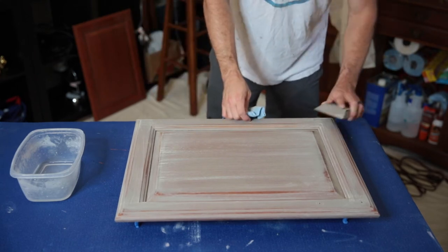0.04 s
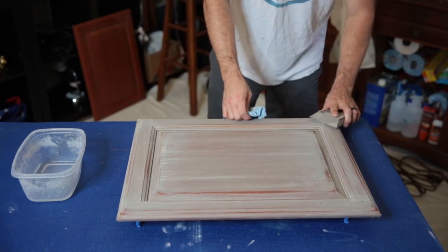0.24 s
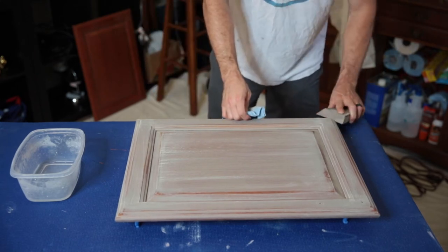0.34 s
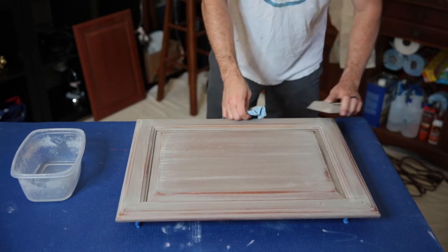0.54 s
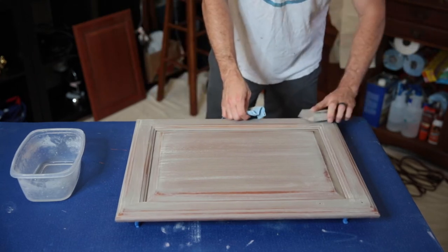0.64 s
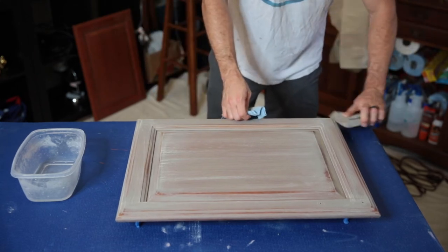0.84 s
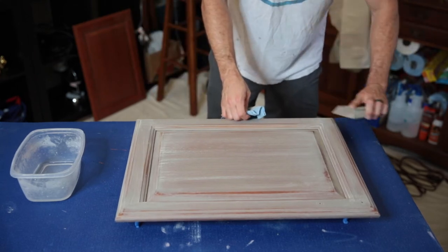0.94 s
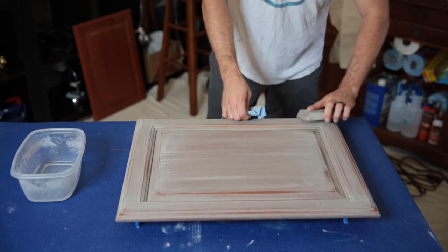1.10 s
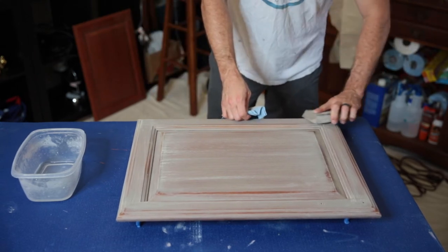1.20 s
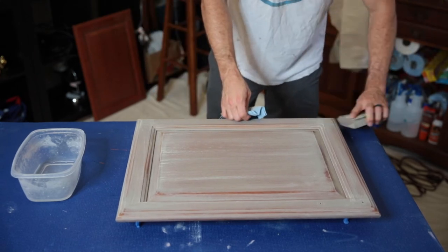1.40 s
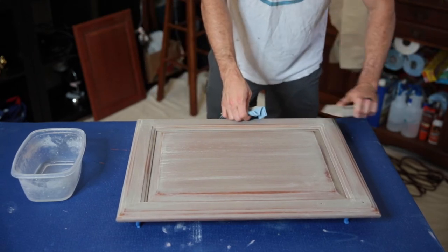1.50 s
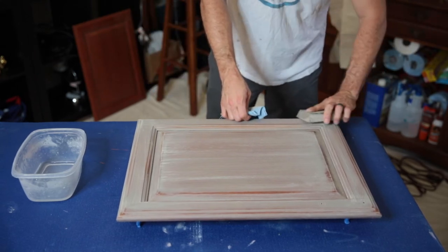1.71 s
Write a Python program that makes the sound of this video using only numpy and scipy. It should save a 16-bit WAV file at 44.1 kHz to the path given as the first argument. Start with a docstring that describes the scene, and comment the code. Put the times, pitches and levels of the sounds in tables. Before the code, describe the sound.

Sanding on a painted wooden door: the tail of one gritty stroke at the start, then quick raspy strokes at about 0.2-0.5, 0.7-1.0 and 1.2-1.6 seconds, brightest near 0.33, 0.8 and 1.3. Light woody bumps, tiny grain ticks and soft low thuds accompany them. The panel drums hollowly; a small workshop rings briefly over quiet room tone and faint hum. Close, mono.

```python
"""Sanding a cabinet door

A sanding block sweeps in quick strokes along the edge of a painted wooden door on a workbench.
Dense grit impacts scratch the paint, brighter as the block speeds up, and drum the panel's modes.
Coarse grains tick, the block bumps on the moulding, and slow pushes flex the panel in soft thuds.
A small workshop rings after each stroke, over room tone and a faint mains hum; both channels are alike."""
import sys
import numpy as np
from scipy import signal
from scipy.fft import rfft, irfft
from scipy.io import wavfile

SR = 44100
rng = np.random.default_rng(int(sys.argv[2]) if len(sys.argv) > 2 else 0)


def inscribe(sig):
    """Save sig as 16-bit PCM at rate SR to the path in sys.argv[1].

    A 1-D sig is mono; a 2-D sig holds one channel per row.
    Samples are clipped to [-1, 1] before scaling.
    """
    pcm = np.round(np.clip(np.atleast_2d(sig).T, -1, 1) * 32767)
    wavfile.write(sys.argv[1], SR, pcm.astype(np.int16))


N = 77175
LEAD = SR // 3  # samples run before time 0: the first stroke is already under way

# Strokes of the block: start [t/s], fastest [t/s], end [t/s], scratch [level/dB], fizz [level/dB],
# panel rumble [level/dB], lag of the fizz peak [t/s]
STROKES = [(-.29, -0.153, 0.036, -3.5, 1, -12, -0.02), (0.217, 0.329, 0.51, -1, 0.5, -1.5, 0.01),
           (0.716, 0.797, 1.044, -5.5, -1.5, -5, 0.0014), (1.21, 1.308, 1.573, -5.5, -2.5, 1, 0.04)]
# Scratch of the grit on paint: [f/Hz], spectrum [level/dB]
SCRATCH_SPECTRUM = [(100, -7), (500, -16.5), (950, -10.5), (1250, -0.5), (1900, 1), (2350, 0), (3600, -1),
                    (5000, -4), (7000, -8), (10000, -18), (15500, -29)]
# Fizz of the finest grit: [f/Hz], spectrum [level/dB]
FIZZ_SPECTRUM = [(1000, 1), (3000, -30), (5000, 3), (7500, 5.5), (9500, 0.5), (12000, 0), (15500, -6)]
# Modes of the door panel: [f/Hz], relative [level/dB], 60 dB decay [t/s]
PANEL_MODES = [(131.5, -15, 0.17), (152.3, -8, 0.16), (230.2, -5, 0.15), (285, -9, 0.11), (305, -3, 0.092),
               (398, -0.5, 0.033), (438, 6.5, 0.1), (500.6, -8.5, .13), (574, -3.5, .13),
               (635.6, -8.5, 0.051), (716, -30, 0.11), (780, -7.5, 0.091)]
# Narrow resonances in the rasp of the block: [f/Hz], relative [level/dB], 60 dB decay [t/s]
RASP_MODES = [(1222, 2, 0.035), (1587, 1, 0.014), (2030, 3, 0.038), (2310, 12.5, 0.03), (2450, 1, .035),
              (2520, -24, .045), (3223, -1.5, .05), (4050, 2, 0.037), (5150, -6, .03)]
# Decay of the workshop: [f/Hz], 60 dB decay [t/s]
ROOM_DECAY = [(100, 1.02), (450, 0.9), (2000, 1.09), (5000, 0.91), (9000, 0.49), (15000, 0.16)]
# Echo of the workshop: [f/Hz], [level/dB]
ROOM_LEVEL = [(100, -6), (450, -4), (2000, -6), (6000, -9), (14000, -2)]
# Room tone: [f/Hz], spectrum [level/dB]
AIR_SPECTRUM = [(20, -28), (45, -11), (70, -43), (110, 2), (400, 7.5), (1000, -2), (4000, -14), (9000, -18),
                (15500, -24)]
# Snaps of coarse grains: [t/s], [level/dB], centre [f/Hz], share of broad scratch [gain]
SNAPS = [(.172, -55, 5940, .8), (.214, -38.5, 7300, 0.63), (.695, -50, 5070, 1), (0.94, -32, 5360, 0.36),
         (1.066, -41.5, 2140, 0.19), (1.192, -41, 4700, 0.27), (1.478, -37, 5100, 0.7),
         (1.719, -41, 4800, 0.69)]
# Bumps of the block on the moulding: [t/s], [level/dB], swell of contact [t/s], chatter length [t/s]
BUMPS = [(.212, -35, 0.0012, 0.028), (0.297, -33, 0.011, 0.044), (.36, -42.5, 0.0025, 0.014),
         (0.423, -42, 0.011, 0.018), (0.506, -44.5, 0.0036, 0.01), (.603, -41.5, 0.0043, .022),
         (0.701, -48, 0.003, 0.014), (.742, -36.5, 0.0014, 0.035), (.804, -29, 0.013, 0.03),
         (0.935, -40.5, .005, 0.017), (.973, -36.5, 0.0071, 0.041), (1.069, -42.5, 0.0023, 0.022),
         (1.198, -43.5, 0.017, 0.061), (1.272, -36, 0.0058, 0.015), (1.439, -42, 0.0021, 0.013),
         (1.553, -44.5, 0.0016, 0.012)]
# Soft pushes as the block presses over the corner: middle [t/s], [level/dB]
PUSHES = [(0.238, -41), (0.317, -34), (0.454, -44.5), (0.621, -42), (0.716, -48.5), (0.821, -44),
          (.978, -40), (1.015, -43), (1.214, -42.5), (1.257, -43.5), (1.313, -33), (1.75, -58)]

# Shape of the speed arch, and how steeply fizz and rumble follow the speed (exponents)
RISE_POWER, FALL_POWER, FIZZ_POWER, RUMBLE_POWER = 1.23, 1.67, 1.69, 0.17
GRIT_PER_S, GRIT_SPREAD_DB = 14000, 2.5
GRIP_DB, GRIP_HZ = 0.45, 90  # depth and fastest rate of the clumping
SCRATCH_DB, FIZZ_DB, RUMBLE_DB, RASP_DB = -29, -36.5, -44, -37.5
BODY_CUT_HZ = 98  # the open panel radiates little below this
AIR_DB, HUM_DB, HUM_HZ = -52, -62, 59  # levels are rms
SNAP_WIDTH_OCT, SNAP_S = 0.11, 0.004
BLOW_S, SOFTEN_S = 0.00098, 0.0035  # the padded blow peaks at a quarter of BLOW_S
CHATTER_GAIN, CHATTER_PER_S = 0.29, 1500
PLACE_DB = 3.5  # each bump lands on another spot and weights the modes differently
CLACK_DB, CLACK_S = -7, 0.018
PUSH_HZ, PUSH_S, PUSH_SAG_HZ_PER_S = 146.8, 0.02, 350
EDGE_HZ = 15800  # upper band limit of the recorder


def amp(db):
    """Decibels to gain."""
    return 10 ** (np.asarray(db) / 20)


def evened(x):
    """Scales to rms 1."""
    return x / np.sqrt(np.mean(x ** 2) + 1e-20)


def read(points, hz):
    """Reads a table on a log-frequency axis."""
    f, value = np.transpose(points)
    return np.interp(np.log(hz + 1), np.log(f), value)


def colour(x, points):
    """Gives a sound a spectrum, at rms 1."""
    gain = amp(read(points, np.fft.rfftfreq(len(x), 1 / SR)))
    return evened(irfft(rfft(x) * gain, len(x)))


def filtered(x, order, hz, kind):
    """Butterworth filter."""
    return signal.sosfilt(signal.butter(order, hz, kind, fs=SR, output="sos"), x)


def add(mix, s, sound):
    """Mixes a sound in at a time in seconds."""
    part = mix[LEAD + round(s * SR):][:len(sound)]
    part += sound[:len(part)]


def ring(force, modes):
    """Passes a force through decaying modes of total energy 1."""
    t = np.arange(SR // 2) / SR
    body = sum(amp(db - 60 * t / t60) * np.cos(2 * np.pi * hz * t) for hz, db, t60 in modes)
    body = filtered(body, 4, BODY_CUT_HZ, "highpass")
    return signal.fftconvolve(force, body / np.linalg.norm(body))[:len(force)]


def pace(t, start, fastest, end):
    """Speed of the block over one stroke, 0-1: a lopsided arch."""
    up = np.clip((t - start) / (fastest - start), 0, 1)
    down = np.clip((end - t) / (end - fastest), 0, 1)
    return np.sin(np.pi / 2 * up) ** RISE_POWER * np.sin(np.pi / 2 * down) ** FALL_POWER


def grit(size):
    """Dense tiny impacts of uneven strength, in clumps where the paper grips."""
    hits = (rng.random(size) < GRIT_PER_S / SR) * rng.choice([-1, 1], size)
    strength = amp(GRIT_SPREAD_DB * np.minimum(rng.exponential(1, size), 4))
    grip = evened(filtered(rng.standard_normal(size), 2, GRIP_HZ, "lowpass"))
    return evened(hits * strength * amp(GRIP_DB * grip))


def sanding(t):
    """Each stroke speeds up and slows down; scratch, fizz and rumble follow the speed by their own laws."""
    scratch, fizz, rumble = np.zeros((3, len(t)))
    for start, fastest, end, scratch_db, fizz_db, rumble_db, lag in STROKES:
        speed = pace(t, start, fastest, end)
        scratch += amp(scratch_db) * speed
        fizz += amp(fizz_db) * pace(t, start, fastest + lag, end) ** FIZZ_POWER
        rumble += amp(rumble_db) * speed ** RUMBLE_POWER
    force = grit(len(t))  # the same impacts scratch the paint and drum the panel
    scratching = amp(SCRATCH_DB) * scratch * colour(force, SCRATCH_SPECTRUM)
    rasping = amp(RASP_DB) * ring(scratch * grit(len(t)), RASP_MODES)
    fizzing = amp(FIZZ_DB) * fizz * colour(grit(len(t)), FIZZ_SPECTRUM)
    drumming = amp(RUMBLE_DB) * ring(rumble * force, PANEL_MODES)
    return scratching + rasping + fizzing + drumming


def workshop(x):
    """Diffuse echoes, each band dying at its own speed."""
    hz, t, bands = signal.stft(rng.standard_normal(SR), SR, nperseg=256)
    t60 = read(ROOM_DECAY, hz)[:, None]
    decay = amp(read(ROOM_LEVEL, hz)[:, None] - 60 * t / t60)
    even_energy = np.sqrt(2 * np.log(1000) / (t60 * SR))  # long decays gain no extra energy
    tail = signal.istft(bands * decay * even_energy, SR, nperseg=256)[1]
    echo = np.r_[np.zeros(SR // 200), tail]  # 5 ms before the echoes begin
    return signal.fftconvolve(x, echo)[:len(x)]


def room_tone():
    """Steady coloured noise of the room, with the mains hum as one sine."""
    t = np.arange(N) / SR
    air = amp(AIR_DB) * colour(rng.standard_normal(N), AIR_SPECTRUM)
    hum = amp(HUM_DB) * np.sqrt(2) * np.sin(2 * np.pi * HUM_HZ * t)
    return air + hum


def snaps(size):
    """A coarse grain catches and lets go with a short bright tick."""
    out, t = np.zeros(size), np.arange(2048) / SR
    hz = np.fft.rfftfreq(len(t), 1 / SR) + 1
    for s, db, pitch, broad in SNAPS:
        peak = np.exp(-(np.log2(hz / pitch) / SNAP_WIDTH_OCT) ** 2)
        shape = peak + broad * amp(read(SCRATCH_SPECTRUM, hz))
        noise = evened(irfft(rfft(rng.standard_normal(len(t))) * shape))
        add(out, s, amp(db) * noise * np.exp(-t / SNAP_S))
    return out


def bumps(size):
    """A padded blow, softer where contact swells slowly, and chatter ring the panel; the block clacks dully."""
    out, t = np.zeros(size), np.arange(SR // 2) / SR
    pad = t / BLOW_S * np.exp(-4 * t / BLOW_S)
    for s, db, swell, length in BUMPS:
        contact = 1 - np.exp(-t / swell)
        hits = rng.standard_normal(len(t)) * (rng.random(len(t)) < CHATTER_PER_S / SR)
        force = CHATTER_GAIN * hits * contact * np.exp(-(t / length) ** 2)
        force[0] = np.exp(-swell / SOFTEN_S)  # the blow itself
        modes = [(hz, level + PLACE_DB * rng.standard_normal(), t60) for hz, level, t60 in PANEL_MODES]
        knock = ring(signal.fftconvolve(force, pad)[:len(t)], modes)
        knock = knock / knock[:SR // 25].std()  # level set over the first 40 ms
        clack = evened(filtered(rng.standard_normal(len(t)), 2, [300, 2200], "bandpass"))
        clack = amp(CLACK_DB) * clack * contact * np.exp(-t / CLACK_S)
        add(out, s, amp(db) * (knock + clack))
    return out


def pushes(t):
    """Slow pressure flexes the panel in a single low tone: a soft thud, sagging in pitch."""
    out = np.zeros(len(t))
    for s, db in PUSHES:
        from_middle = t - s
        swell = np.exp(-(from_middle / PUSH_S) ** 2)
        cycles = PUSH_HZ * from_middle - PUSH_SAG_HZ_PER_S * from_middle ** 2 / 2 + rng.random()
        out += amp(db) * np.sqrt(2) * swell * np.sin(2 * np.pi * cycles)
    return out


def scene():
    """Block and door in the workshop, the same in both channels."""
    t = np.arange(-LEAD, N) / SR
    direct = sanding(t) + snaps(len(t)) + bumps(len(t)) + pushes(t)
    mono = (direct + workshop(direct))[LEAD:] + room_tone()
    return np.array([mono, mono])


def record(dry):
    """The recorder's band limit: a steep linear-phase low-pass."""
    band_limit = signal.firwin(801, EDGE_HZ, window=("kaiser", 9), fs=SR)
    return signal.oaconvolve(dry, band_limit[None], "same")


dry = scene()
out = record(dry)
inscribe(out)
```